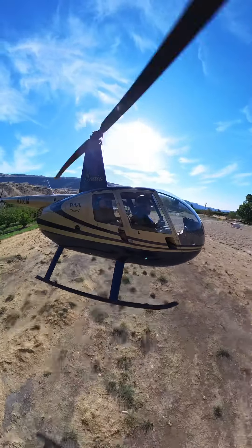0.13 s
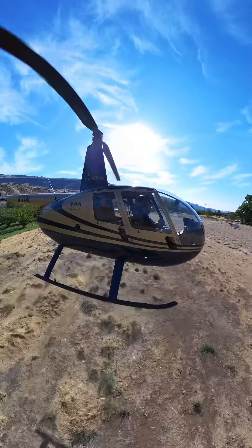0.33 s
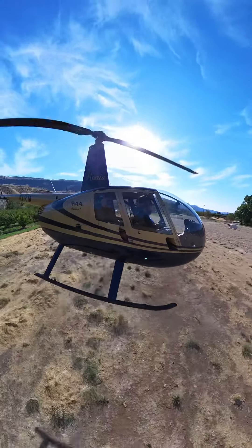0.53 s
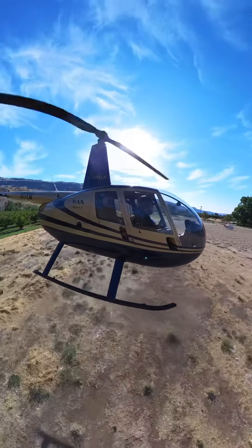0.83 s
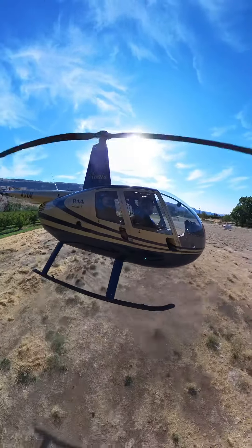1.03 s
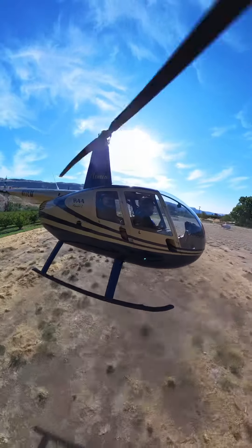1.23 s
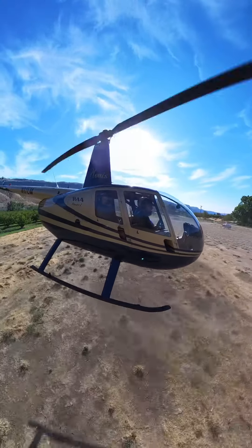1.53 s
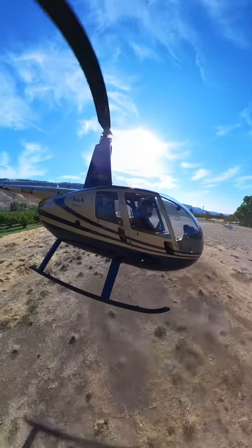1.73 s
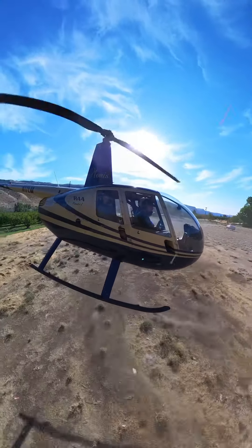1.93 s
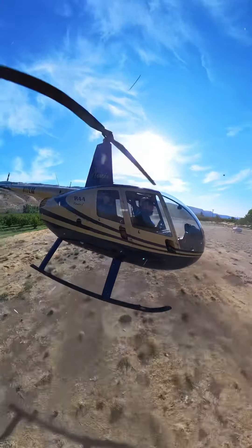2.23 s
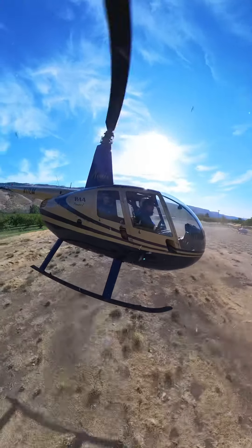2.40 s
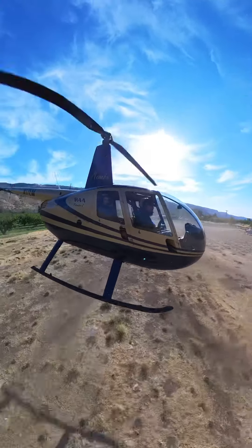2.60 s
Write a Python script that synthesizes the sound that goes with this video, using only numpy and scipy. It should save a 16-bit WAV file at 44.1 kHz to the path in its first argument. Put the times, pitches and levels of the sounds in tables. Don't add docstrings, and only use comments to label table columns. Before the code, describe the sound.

A small piston helicopter hovers close by outdoors. Rapid, regular blade swishes slide downward in pitch, each followed by a dull slap of air, over engine drone, hiss and wind buffeting the nearby microphone.

```python
import sys
import numpy as np
from scipy import signal
from scipy.io import wavfile
from scipy.ndimage import uniform_filter1d, map_coordinates

SR = 44100
rng = np.random.default_rng(int(sys.argv[2]) if len(sys.argv) > 2 else 0)


def amplitude_ratio(level_db):
    exponent = np.asarray(level_db, float) / 20
    return 10 ** exponent


def unload_wav(signal):
    wavfile.write(
        sys.argv[1],
        SR,
        np.round(np.clip(np.atleast_2d(signal).T, -1, 1) * 32767).astype(np.int16),
    )


N = 121716

BLADE_S, FIRST_BLADE_S = .073505, -.0011

# (time [s], level [dB])
BLADE_LOAD = [(0, -1), (.3, -6.5), (.6, -4), (.85, 1.5), (1.4, -0.5), (2.0, -1.5), (2.25, -3), (2.38, 1),
              (2.57, -7.5), (2.76, -3.5)]


def rms_one(x):
    return x / np.sqrt(np.mean(x ** 2) + 1e-20)


def in_time(rows):
    return np.interp(np.arange(N) / SR, *np.transpose(rows))


def drift(rate):
    step = 40
    r = np.exp(-2 * step * np.pi * rate / SR)
    noise = rng.standard_normal(N // step + 2002)
    slow = signal.lfilter([1], [1, -2 * r, r * r], noise)[2000:]
    return np.interp(np.arange(N) / step, np.arange(len(slow)), rms_one(slow))


def resonance(x, hz, width):
    r = np.exp(-np.pi * width / SR)
    top = np.array([1, 0, -1]) * (1 - r * r) / 2
    return signal.lfilter(top, [1, -2 * r * np.cos(2 * np.pi * hz / SR), r * r], x)


def band_pass(x, order, low, high):
    return signal.sosfilt(signal.butter(order, [low, high], "band", fs=SR, output="sos"), x)


def bands(spectrum, shape_db):
    hz, db = np.transpose(spectrum)
    edges = np.geomspace(hz[0], hz[-1], int(3 * np.log2(hz[-1] / hz[0])) + 2)
    white = rng.standard_normal((2, N + 4000))
    total = np.zeros(N)
    for k, (low, high) in enumerate(zip(edges, edges[1:])):
        middle = np.sqrt(low * high)
        level = np.interp(np.log(middle), np.log(hz), db) + shape_db(middle)
        total += amplitude_ratio(level) * band_pass(white[k % 2], 3, low, high)[-N:]
    return rms_one(total)


def since_blade(peak_s):
    t = np.arange(N) / SR - FIRST_BLADE_S - peak_s
    number = np.round(t / BLADE_S)
    return t - number * BLADE_S, (number + 1).astype(int)


def sweep(peak_s, rise_s, fall_s, scatter_db):
    t, number = since_blade(peak_s)
    last = number.max()
    each = amplitude_ratio(scatter_db * rng.standard_normal(last + 1))

    def passage(u, n):
        return each[n] * 2 / (np.exp(-u / rise_s) + np.exp(np.minimum(u / fall_s, 50)))

    before = passage(t + BLADE_S, np.maximum(number - 1, 0))
    after = passage(t - BLADE_S, np.minimum(number + 1, last))
    return passage(t, number) + before + after


def doppler(x):
    overhead_s, span_s, tip_shift = .005, .0072, .15
    t, _ = since_blade(overhead_s)
    speed = np.tanh(t / span_s) * np.cos(np.pi * t / BLADE_S) ** 0.348
    return map_coordinates(x, [np.cumsum(1 - tip_shift * speed)], order=3)


def blades():
    # (pitch [Hz], width [Hz], level [dB])
    edge_noise = [(9910, 2900, 0), (7300, 4100, -13), (5380, 1400, -12.5), (3150, 1300, -19.5)]
    whistle_hz, whistle_width_hz, whistle_db = 5780, 580, -43
    swish_db, bed_db = -24, -22
    port_hz, port_width_hz, port_db = 10410, 890, 8.5

    white = rng.standard_normal((2, 2 * N))
    edge = np.zeros(2 * N)
    for hz, width, db in edge_noise:
        edge += amplitude_ratio(db) * rms_one(resonance(resonance(white[0], hz, width), hz, width))
    pipe = resonance(white[1], whistle_hz, whistle_width_hz)
    pipe = rms_one(resonance(pipe, whistle_hz, 3 * whistle_width_hz))

    passing = sweep(peak_s=.003, rise_s=.011, fall_s=.0045, scatter_db=1.0)
    swell = np.tanh(1.3 * passing ** 1.1) + amplitude_ratio(bed_db)
    swish = amplitude_ratio(swish_db - port_db) * swell * doppler(edge)
    swish = swish + amplitude_ratio(port_db) * resonance(swish, port_hz, port_width_hz)
    swish = band_pass(swish, 5, 3240, 12930)

    tip = sweep(peak_s=-.0034, rise_s=.01, fall_s=.011, scatter_db=3)
    whistle = amplitude_ratio(whistle_db) * tip * doppler(pipe)
    return amplitude_ratio(in_time(BLADE_LOAD) + 2.6 * drift(60)) * (swish + whistle)


def downwash():
    # (pitch [Hz], level [dB per Hz])
    roar_colour = [(100, -3), (140, -0.5), (270, -1), (410, -4), (800, -12), (1300, -20), (1600, -29.5),
                   (4000, -43.5)]
    # (time [s], level [dB])
    wash_strength = [(0, -21.5), (.3, -24.5), (.6, -23), (.9, -21.5), (1.2, -20.5), (1.5, -23), (1.8, -20),
                     (1.97, -21), (2.1, -20.5), (2.2, -21.5), (2.4, -21), (2.6, -24.5), (2.76, -25.5)]
    # (time [s], peak [dB], ring [Hz])
    pressure_kicks = [(0.066, -19, 458), (0.147, -44, 266), (0.226, 4.5, 318), (0.299, 0, 272),
                      (0.372, 2.5, 250), (0.454, -0.5, 199), (0.589, 4, 401), (0.652, -24, 275),
                      (0.74, -1, 266), (0.949, -5.5, 302), (1.024, -1, 208), (1.095, -3, 264),
                      (1.173, 3, 458), (1.326, 3, 347), (1.397, -7.5, 344), (1.472, 6, 363),
                      (1.544, 0.5, 234), (1.618, 7, 365), (1.695, -2, 283), (1.776, 4, 306),
                      (2.003, 6.5, 340), (2.231, 3, 264), (2.337, -33, 205), (2.447, -7, 356)]
    slap_depth_db, slap_from_hz, lag_cycles = 7.2, 190, 4.7
    kick_db, kick_cycles, kick_soft_hz = -1, 2.6, 1110

    swell = slap_depth_db * sweep(peak_s=-.010, rise_s=.0045, fall_s=.04, scatter_db=0.17)
    lumps, wash = drift(132), in_time(wash_strength)

    def roar_db(hz):
        slap = np.roll(swell, int(lag_cycles * SR / hz)) / (1 + (slap_from_hz / hz) ** 4)
        brighter = 0.1 * (wash - wash.mean()) * np.log2(hz / 400)
        return slap + 2.64 * lumps + 0.39 * drift(20) + brighter

    roar = amplitude_ratio(wash) * bands(roar_colour, roar_db)

    kicks = np.zeros(N)
    t = np.arange(int(.04 * SR)) / SR
    for start_s, db, hz in pressure_kicks:
        ring = np.sin(2 * np.pi * hz * t) * amplitude_ratio(-60 * t * hz / kick_cycles)
        kick = ring * (1 - np.exp(-t * kick_soft_hz))
        i = int(start_s * SR)
        kicks[i:i + len(t)] += (amplitude_ratio(db + kick_db) * kick)[:N - i]
    return roar + kicks


def eddy():
    middle_s, length_s, level_db = 2.1, .035, -20
    t = np.arange(N) / SR
    air = rms_one(band_pass(rng.standard_normal(N), 2, 150, 710))
    swell = np.exp(-((t - middle_s) / length_s) ** 2)
    return amplitude_ratio(level_db + 3.3 * drift(140)) * swell * air


def drone(rate_hz, orders, wobble_db, wander):
    turn = 2 * np.pi * np.cumsum(rate_hz * (1 + wander * drift(3.5))) / SR
    total = np.zeros(N)
    for multiple, db in orders:
        level = np.sqrt(2) * amplitude_ratio(db + wobble_db * drift(9))
        total += level * np.sin(multiple * turn + rng.uniform(0, 2 * np.pi))
    return total


def engine():
    # (multiple of crank rate [-], level [dB rms])
    engine_orders = [(1.5, -38), (2.5, -41), (3.0, -30), (3.5, -41), (4.5, -36), (6.0, -32.5), (7.0, -38),
                     (8.0, -39), (9.0, -39), (11.0, -43)]
    # (time [s], level [dB])
    exhaust_facing = [(0, 4.5), (.2, 4.5), (.5, 0.5), (.8, 0), (1.2, 0), (1.8, -2), (2.1, -2.5), (2.4, 0),
                      (2.62, -3.5), (2.76, 6)]
    return amplitude_ratio(in_time(exhaust_facing)) * drone(45.4, engine_orders, wobble_db=1.93, wander=0.0012)


def tail_rotor():
    # (multiple of blade rate [-], level [dB rms])
    tail_orders = [(1.0, -41), (2.0, -41.5), (3.0, -43.5)]
    # (time [s], level [dB])
    tail_facing = [(0, 12), (.6, 5), (1.4, -3), (2.0, 4), (2.4, 2.5), (2.5, 13.5), (2.62, 7), (2.76, 9)]
    return amplitude_ratio(in_time(tail_facing)) * drone(79.43, tail_orders, wobble_db=1.5, wander=0.0027)


def wind():
    # (time [s], level [dB])
    gust_strength = [(0, -25), (.2, -33), (.45, -30), (.8, -31), (1.2, -30.5), (1.6, -32), (2.0, -33),
                     (2.3, -33), (2.42, -25), (2.5, -16.5), (2.57, -25.5), (2.76, -24)]
    # (pitch [Hz], level [dB per Hz])
    buffet_colour = [(25, -36), (40, -5), (55, 2), (80, -1), (120, -8), (170, -5.5), (240, -25)]
    lumps, gust = drift(42), in_time(gust_strength)

    def buffet_db(hz):
        brighter = 0.13 * (gust - gust.mean()) * np.log2(hz / 70)
        return 2.7 * lumps + 0.57 * drift(4.6) + brighter

    return amplitude_ratio(gust) * bands(buffet_colour, buffet_db)


def air_hiss():
    # (pitch [Hz], level [dB per Hz])
    hiss_colour = [(1500, -8.5), (3500, -14.5), (6500, -16), (8300, -18), (10400, -2.5), (11800, -11.5),
                   (13200, -20.5), (15700, -19)]

    def hiss_db(hz):
        return drift(28) + 6.6 * sweep(peak_s=0.0, rise_s=0.011, fall_s=0.011, scatter_db=.5)

    return amplitude_ratio(-39.5 + 0.8 * in_time(BLADE_LOAD)) * bands(hiss_colour, hiss_db)


def unlike(mid):
    # (pitch [Hz], share of patches [0-1])
    apart_share = [(2900, 0), (3000, .8), (8200, .75), (8700, .2), (10000, .04), (11500, .12), (15700, .08)]
    apart_db, apart_top_db, patch_bins = -5.5, -1.5, 24

    hz, _, z = signal.stft(mid, SR, nperseg=2048)
    noise = signal.stft(rng.standard_normal(N), SR, nperseg=2048)[2]
    patch = np.arange(len(hz)) // patch_bins
    level = [np.sqrt(np.mean(abs(z[patch == k]) ** 2, axis=0)) for k in range(patch.max() + 1)]
    level = np.array(level)

    luck = uniform_filter1d(rng.standard_normal(level.shape), size=2, axis=1)
    louder = level / np.median(level, axis=1, keepdims=True)
    luck = luck + .06 * 20 * np.log10(louder + 1e-9)
    luck = np.argsort(np.argsort(luck, axis=1), axis=1) / luck.shape[1]

    patch_hz = (np.arange(len(level)) + .5) * patch_bins * hz[1]
    share = np.interp(patch_hz, *np.transpose(apart_share))[:, None]
    gain = level * (luck < share) * amplitude_ratio(np.where(share > .5, apart_db, apart_top_db))
    noise = noise / np.sqrt(np.mean(abs(noise) ** 2))
    return signal.istft(noise * gain[patch], SR, nperseg=2048)[1][:N]


def scene():
    helicopter = blades() + downwash() + eddy() + engine() + tail_rotor()
    return np.tile(helicopter + wind() + air_hiss(), (2, 1))


def low_pass(x):
    return signal.sosfilt(signal.butter(12, 15720, fs=SR, output="sos"), x)


def record(dry):
    cut = signal.sosfilt(signal.butter(2, 42, "high", fs=SR, output="sos"), dry)
    mix = cut + unlike(cut[0]) * np.array([[1], [-1]])
    return low_pass(mix)


dry = scene()
out = record(dry)
unload_wav(out)
```